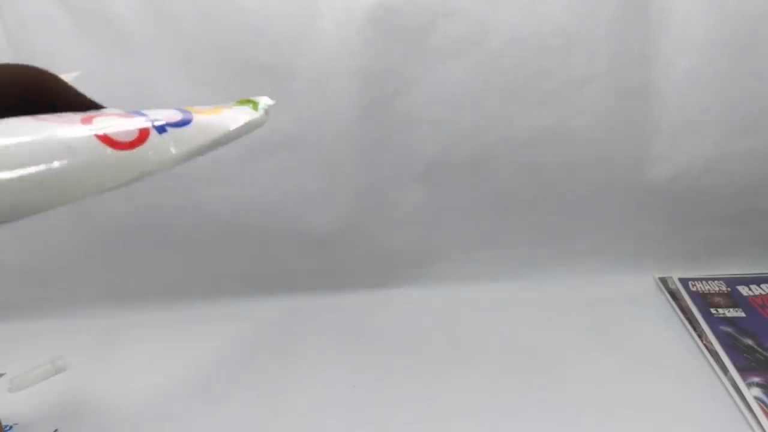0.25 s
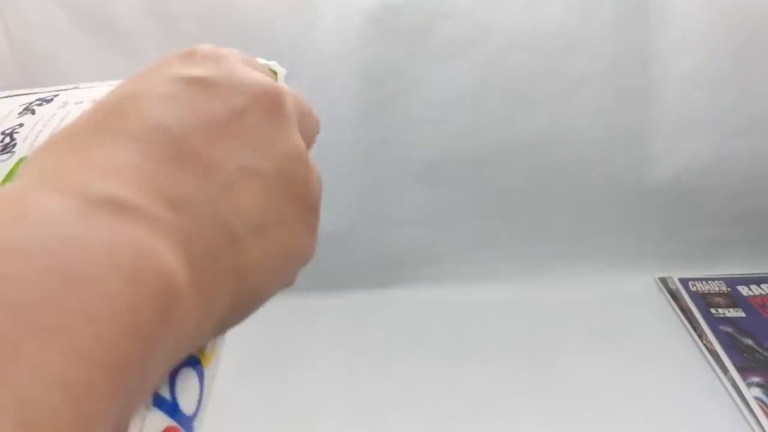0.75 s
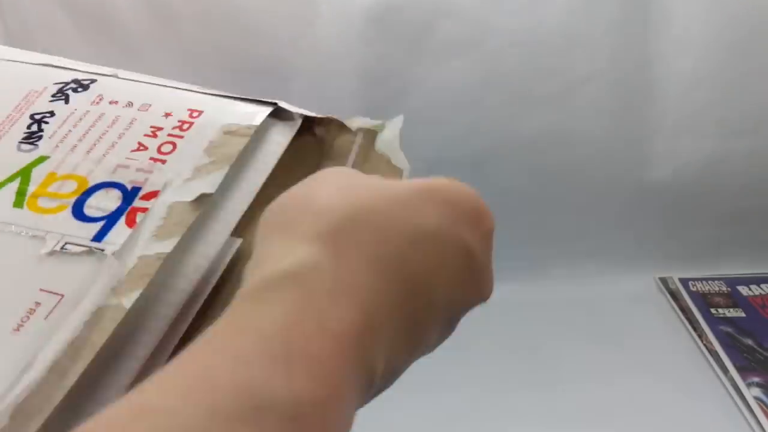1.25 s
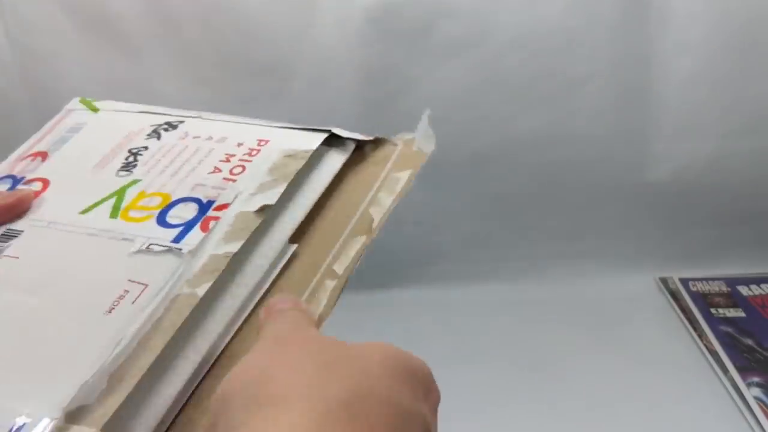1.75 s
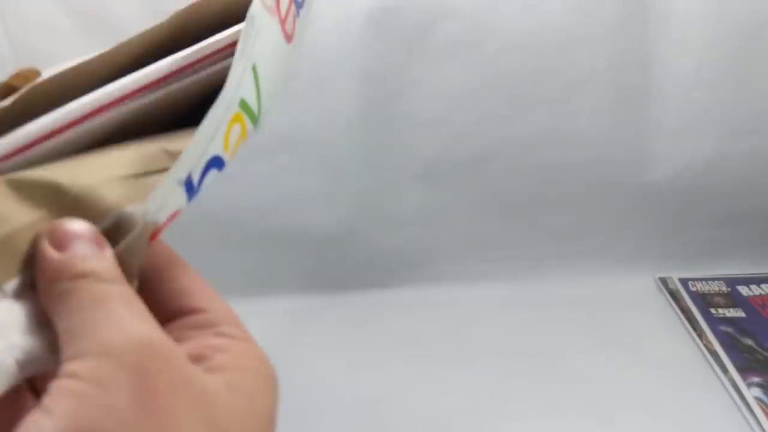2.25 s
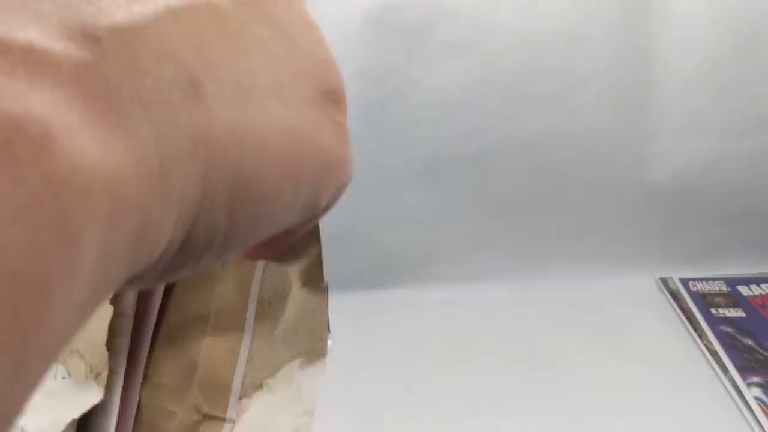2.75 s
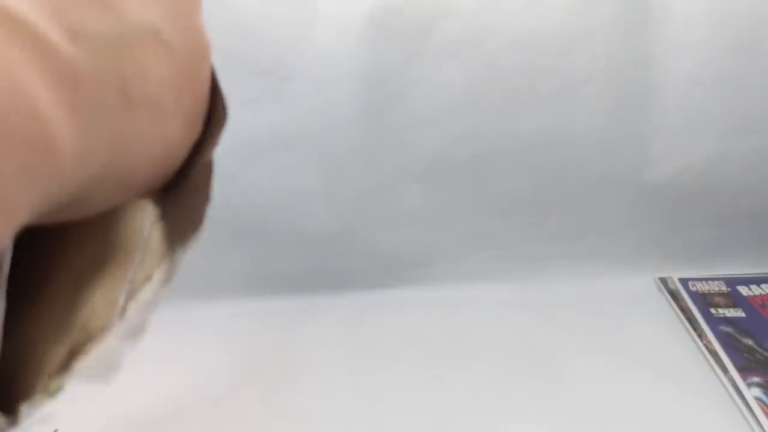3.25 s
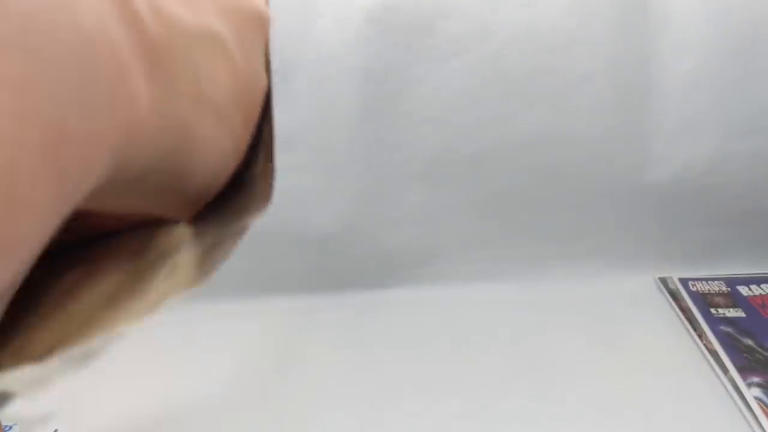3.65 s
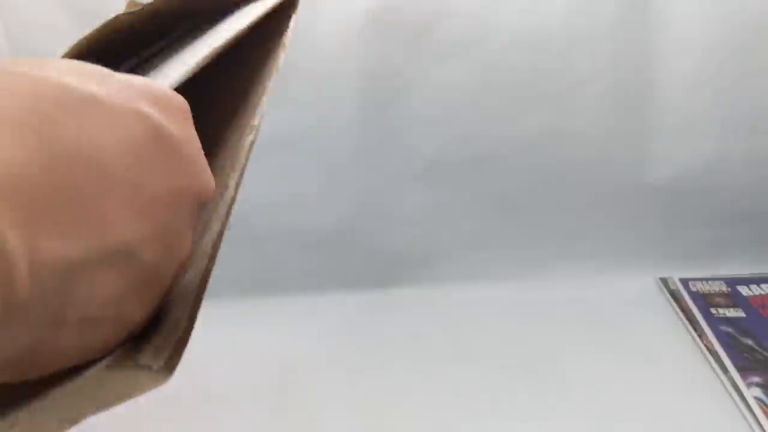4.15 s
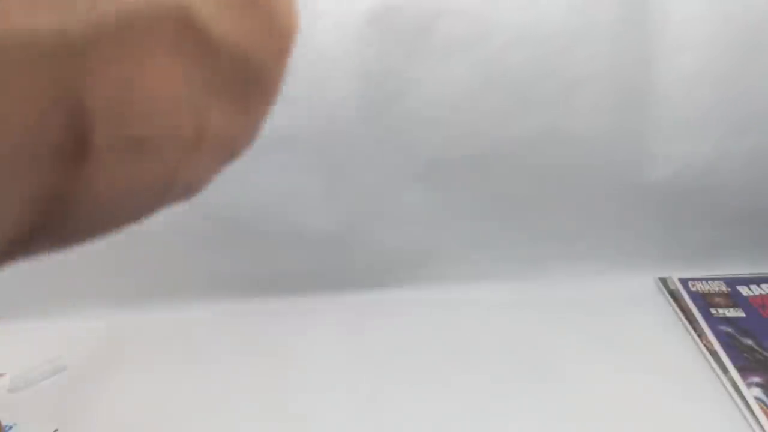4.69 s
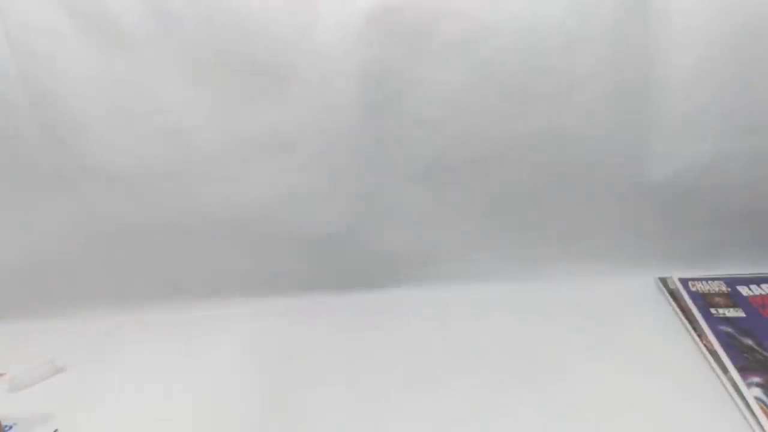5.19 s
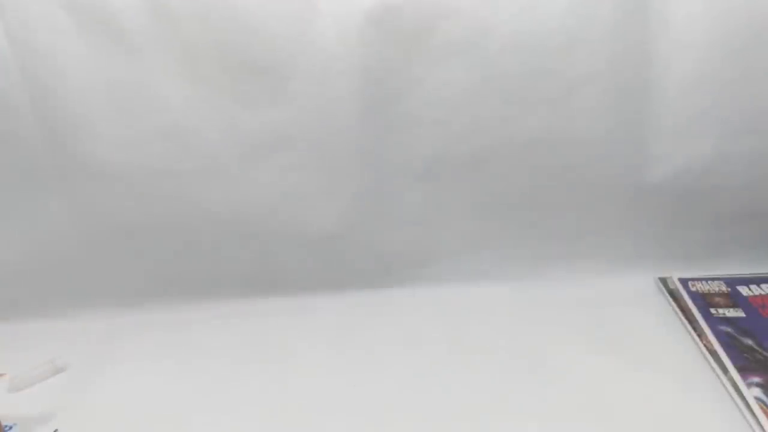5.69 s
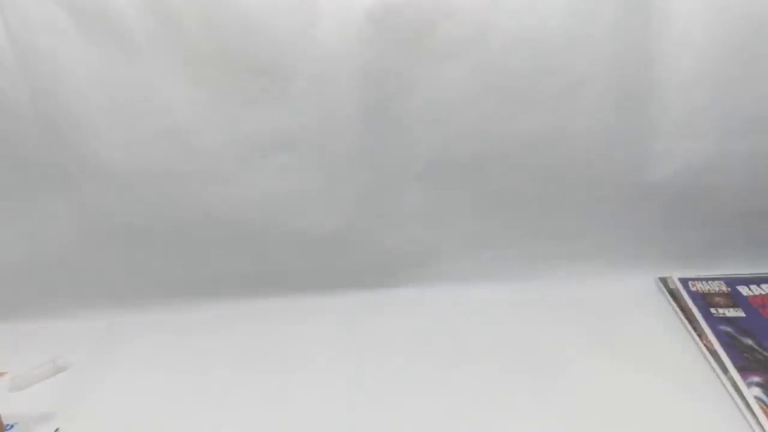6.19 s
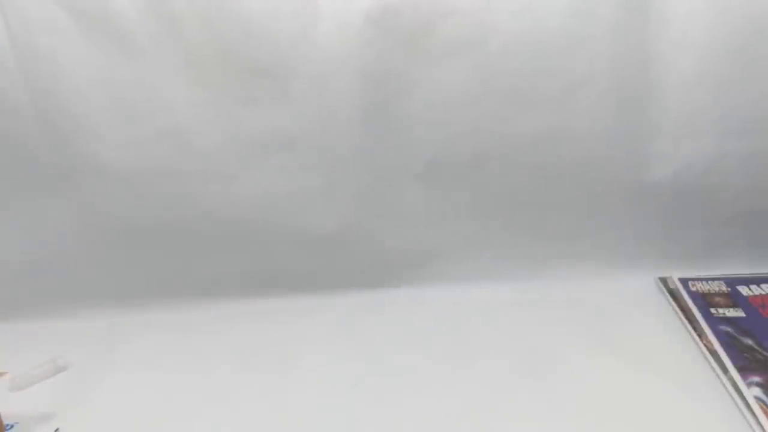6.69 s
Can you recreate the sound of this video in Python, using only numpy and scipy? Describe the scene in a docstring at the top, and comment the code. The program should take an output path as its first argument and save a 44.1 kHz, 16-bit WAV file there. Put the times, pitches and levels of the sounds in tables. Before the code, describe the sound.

Close, crisp cardboard cracking and papery scraping burst out at first, then thin to faint rustles, small pops and low thuds before fading.

```python
"""Hands turn, bend and pull open a cardboard mailer over a table, close to a phone in a small room.
The first two seconds are the busiest: board knocks, creases and glue snap, and the table booms under bumps.
After that come lighter strokes, pops and bumps; the last stroke fades after 6 s. Throughout, a faint hum
runs and the walls answer. Uneven clicks through resonances make paper and board; a sine makes the table."""
import sys
import numpy as np
from scipy import signal
from scipy.fft import rfft, irfft
from scipy.io import wavfile
from scipy.ndimage import uniform_filter1d

SR = 44100
rng = np.random.default_rng(int(sys.argv[2]) if len(sys.argv) > 2 else 0)


def transcribe(signal):
    """Save signal, clipped to [-1, 1], as a 16-bit WAV file at the path in sys.argv[1]."""
    frames = np.atleast_2d(signal).T
    limited = np.clip(frames, -1, 1)
    pcm = np.round(limited * 32767).astype(np.int16)
    wavfile.write(sys.argv[1], SR, pcm)


N = 305680  # length in samples, about 6.9 s

# The tones that thin paper, the board and the whole panel favour.
# Each row: centre in Hz, nominal width in Hz, strength in dB.
PAPER = [(3015, 3860, 2.5), (5390, 3930, 3.5), (7920, 1990, 4)]
BOARD = [(663, 1080, -2.5), (1180, 710, 2), (1860, 1030, -1)]
PANEL = [(127.6, 90, 8.5), (230, 44, 5.5), (350, 209, 1)]


def undb(db):
    """Turns decibels into a plain factor."""
    return 10 ** (np.asarray(db) / 20)


def level(x, db, size=None):
    """Scales by the rms of the first size samples, so they sit at db; db may also change over time."""
    return x * undb(db) / np.sqrt(np.mean(x[:size] ** 2))


def add(track, s, sound):
    """Mixes a sound into the track at s seconds."""
    i = max(int(s * SR), 0)
    track[i:i + len(sound)] += sound[:N - i]


def ring(x, hz, width_hz):
    """One resonance, gain 1 at its centre."""
    b, a = signal.iirpeak(hz, hz / width_hz, fs=SR)
    return signal.lfilter(b, a, x)


def steep(x, hz, width_hz):
    """Two resonances in a row at one pitch, the second twice as wide: weak on both sides."""
    return ring(ring(x, hz, width_hz), hz, 2 * width_hz)


def body(x, modes):
    """Several resonances of one object side by side, with alternating sign."""
    return sum((-1) ** k * undb(db) * steep(x, hz, width_hz) for k, (hz, width_hz, db) in enumerate(modes))


def slips(size, share, scatter_db):
    """Fibres that catch and let go: clicks of very uneven size on a share of the samples."""
    clicks = rng.standard_normal(size) * (rng.random(size) < share)
    return clicks * undb(scatter_db * rng.exponential(size=size))


def break_up(ms):
    """A first break and a run of smaller slips that come in bunches and die away over about ms."""
    t = np.arange(4096) / SR
    bunches = np.repeat(undb(4.0 * rng.standard_normal(64)), 64)
    fade = np.exp(-t * 1000 / np.clip(ms, .2, 40))
    run = slips(len(t), share=0.28, scatter_db=6.0) * bunches * fade
    run[0] = 0.91 * np.abs(run).max()  # the first break
    return run


def walk(rate):
    """Random wandering: rate new values per second, joined by straight slopes; spread a little under 1."""
    k = int(SR / rate)
    return uniform_filter1d(np.repeat(rng.standard_normal(N // k + 1), k), k)[:N]


def hum():
    """Steady noise of the house and the microphone, shaped from bass to treble."""
    # The colour of the noise. Each row: pitch in Hz, relative strength in dB per Hz.
    hum_curve = [(18, -37), (30, -11), (59, 0), (77, -7), (177, -14), (219, -23.5), (277, -18.5),
                 (299, -18.5), (15500, -42.5)]
    hz, db = np.transpose(hum_curve)
    f = np.fft.rfftfreq(N, 1 / SR) + 1  # 1 Hz up, to avoid log(0)
    shape = undb(np.interp(np.log(f), np.log(hz), db))
    return level(irfft(rfft(rng.standard_normal(N)) * shape, N), -65)


def room(x):
    """Wall echoes: noise bands that start after 3 ms and die away, each at its own speed."""
    # How the room echoes. Each row: pitch in Hz, time to fall 60 dB in seconds, strength in dB.
    echo_bands = [(125, 0.22, 3), (250, 0.47, -0.5), (700, 0.49, 5), (1200, 0.36, -0.5), (2120, 0.64, -1.5),
                  (5110, 0.35, -4), (12150, 0.18, -1.5)]
    echo_db = -12.5  # energy of the whole echo against the direct sound
    t = np.arange(int(.6 * SR)) / SR
    hz, t60, db = np.transpose(echo_bands)
    tail = 0
    for f in 60 * 2. ** np.arange(0, 8.5, .5):  # half-octave steps
        ring_s, band_db = (np.interp(np.log(f), np.log(hz), column) for column in (t60, db))
        band = undb(band_db) * steep(rng.standard_normal(len(t)), f, 0.67 * f)
        tail = tail + band * np.exp(-np.log(1000) * t / ring_s)
    tail = tail * np.clip((t - .003) / 0.0051, 0, 1)
    return signal.fftconvolve(x, undb(echo_db) * tail / np.sqrt(np.sum(tail ** 2)))[:N]


def bumps():
    """A soft push sets the table top swinging for a few cycles: a low sine that swells and dies."""
    # Bumps felt through the table top. Each row: start in seconds, level in dB before the swell and decay.
    pushes = [(0.127, -36), (0.53, -38.5), (0.861, -47), (1, -55), (1.2, -38.5), (1.278, -44), (1.741, -41),
              (2.047, -43), (3.076, -57), (3.761, -40.5), (3.963, -42), (4.121, -48), (4.453, -39.5),
              (4.603, -40), (4.97, -38.5), (5.527, -39.5), (5.585, -46), (5.646, -41.5), (5.878, -48.5),
              (6.27, -52)]
    table_hz, scatter = 62.3, 0.088  # the table's swing; how far the place of the push bends it (share)
    out, t = np.zeros(N), np.arange(SR // 2) / SR
    swell = 1 - np.exp(-t / 0.0035)
    swing = swell * np.exp(-np.log(1000) * t / 0.21)  # falls 60 dB in 0.21 s
    for (s, db), bend in zip(pushes, rng.standard_normal(len(pushes))):
        hz = table_hz * (1 + scatter * bend)
        add(out, s, undb(db) * swing * np.sin(2 * np.pi * hz * t))
    return out


def pressure():
    """Hiss and rustle levels in dB: a light grip, plus strokes that rise, hold and let go."""
    # Strokes of the hand over the paper. Each row: start of full pressure in seconds, rise in seconds,
    # hold in seconds, release in seconds, paper hiss in dB, board rustle in dB.
    strokes = [(0.0, .02, 0.036, 0.093, -51, -52), (0.07, 0.015, .003, .02, -48, -53),
               (0.106, 0.029, 0.047, 0.062, -41.5, -34.5), (0.198, .03, .003, 0.22, -53.5, -51.5),
               (0.342, 0.015, 0.0038, .025, -39, -33.5), (0.375, 0.021, 0.099, 0.09, -62.5, -62),
               (0.529, 0.028, 0.011, 0.18, -55.5, -49), (0.646, 0.28, .003, 0.45, -60, -61),
               (0.858, 0.21, 0.042, .05, -89, -64.5), (0.977, 0.054, .003, 0.17, -56.5, -52.5),
               (1.162, 0.022, .003, 0.096, -40, -31), (1.256, 0.16, .003, 0.33, -59.5, -52),
               (1.649, 0.049, 0.0025, 0.029, -42.5, -44.5), (1.742, 0.17, .003, 0.068, -52, -56.5),
               (1.8, .05, 0.022, 0.45, -59.5, -67.5), (2.034, 0.036, 0.0023, 0.012, -34.5, -45),
               (2.041, .02, .003, 0.1, -56, -44.5), (2.213, .2, .003, 0.055, -58, -64),
               (2.488, 0.36, .003, .04, -65, -68), (2.606, 0.16, 0.042, .15, -74.5, -66),
               (2.904, 0.6, .003, 0.11, -63, -65.5), (3.062, 0.086, 0.0026, 0.063, -61, -55.5),
               (3.103, 0.06, 0.015, 0.21, -57.5, -52), (3.197, 0.25, 0.044, 0.32, -57, -64),
               (3.633, 0.075, 0.037, 0.14, -60, -70), (3.724, 0.082, 0.075, 0.11, -56, -59.5),
               (3.975, 0.18, .003, 0.17, -62.5, -58), (4.092, 0.037, 0.019, 0.051, -46, -55.5),
               (4.253, 0.24, .003, .09, -58, -60), (4.401, 0.067, .003, .04, -56, -50),
               (4.45, 0.13, 0.05, .05, -62, -61.5), (4.561, 0.062, 0.08, 0.16, -44.5, -49),
               (4.91, .03, .04, .05, -61, -51.5), (4.983, 0.097, .003, 0.23, -46.5, -48),
               (5.336, 0.026, 0.057, 0.055, -71, -70.5), (5.53, .01, 0.016, 0.18, -83, -57.5),
               (5.647, 0.054, .003, .15, -56.5, -59.5), (5.72, 0.076, 0.16, 0.15, -62.5, -70),
               (5.913, 0.19, .003, 0.063, -54, -58), (5.966, .05, .03, .25, -67.5, -71),
               (6.117, 0.027, 0.28, 0.39, -57.5, -61)]
    swing_db = 24  # a stroke climbs this much in its rise time and drops it in its release time
    grip_hiss_db, grip_rustle_db, grip_ends_s = -72.5, -77, 5.4  # fingers that merely hold the mailer
    t = np.arange(0, N + 64, 64) / SR  # one value per 64 samples
    grip = undb(-swing_db * np.clip((t - grip_ends_s) / 0.26, 0, 1))
    power = np.outer(undb([grip_hiss_db, grip_rustle_db]), grip) ** 2
    for s, rise, hold, release, hiss_db, rustle_db in strokes:
        down = np.maximum(s - t, 0) / rise + np.maximum(t - s - hold, 0) / release
        power = power + np.outer(undb([hiss_db, rustle_db]), undb(-swing_db * down)) ** 2
    return [np.interp(np.arange(N) / SR, t, 10 * np.log10(p)) for p in power]


def slide():
    """Dense fibre slips, uneven in pressure, heard through paper, board and panel."""
    hiss_db, rustle_db = pressure()
    soft_db = -60  # the level from which the two slopes below are counted
    sheen_db = soft_db - 16 + 1.075 * (hiss_db - soft_db)  # the sheen grows faster than the hiss
    flex_db = soft_db - 2.5 + 0.77 * (rustle_db - soft_db)  # low flexing grows slower than the rustle
    fine = slips(N, share=.4, scatter_db=1.0) * undb(2.0 * walk(45))
    coarse = slips(N, share=.06, scatter_db=1.5) * undb(4.0 * walk(30))
    # each patch of the sheet catches on its own, so the colour keeps shifting
    hiss = 0
    for k, (hz, width_hz, db) in enumerate(PAPER):
        hiss = hiss + (-1) ** k * undb(db + 1.08 * walk(22)) * steep(fine, hz, width_hz)
    treble = signal.sosfilt(signal.butter(4, 9500, "high", fs=SR, output="sos"), fine)
    paper = level(hiss, hiss_db) + level(ring(treble, 9060, 2900), sheen_db)
    return paper + level(body(coarse, BOARD), rustle_db) + level(body(coarse, PANEL), flex_db)


def crackles():
    """Thin paper breaks, each coloured by the patch that lets go."""
    # Creases and glue let go. Each row: start in seconds, peak level in dB, colour in Hz,
    # fading time of the slips in ms.
    snaps = [(0.093, -31, 5220, 0.81), (0.104, -14.5, 8200, 1.15), (0.214, -39, 4640, 3.0),
             (0.334, -26, 4500, 4.1), (0.395, -36.5, 5030, 1.3), (0.41, -47, 6210, 3.0),
             (0.491, -39, 6440, 1.5), (0.768, -55, 3470, 2.1), (0.948, -45, 4000, 3.0),
             (1.345, -37.5, 3280, 4.1), (1.405, -43.5, 3880, 3.3), (1.572, -45, 5700, 1.5),
             (1.591, -34.5, 5330, 0.7), (1.645, -21, 5740, 0.23), (1.654, -40, 4780, 0.62),
             (1.66, -48, 3930, 2.3), (1.978, -42.5, 5170, 0.46), (2.016, -45, 5700, 5),
             (2.023, -23.5, 7100, 5.5), (2.028, -20.5, 6600, 1.9), (2.069, -28, 3900, 0.39),
             (2.256, -45, 5860, 2.0), (2.462, -48.5, 3600, 1.6), (2.481, -39.5, 5200, 1.3),
             (3.035, -44.5, 3370, 3.9), (3.462, -51, 4700, 3.4), (3.999, -38, 3230, 1.6),
             (4.082, -36, 6600, 3.4), (4.211, -43.5, 4840, 3.9), (4.33, -45, 6560, 1.5),
             (4.39, -45, 3510, 1.1), (4.397, -34, 5640, 1.6), (4.915, -38.5, 4100, 2.6),
             (5.331, -53, 5900, 2.5), (5.547, -52, 3070, 1.9), (5.589, -53, 4700, 2.5),
             (5.631, -44.5, 6140, 3.4)]
    out = np.zeros(N)
    for s, db, hz, ms in snaps:
        run = break_up(ms)
        crack = 0.37 * body(run, PAPER) + steep(run, hz, 0.35 * hz) + 0.043 * steep(run, 12000, 8000)
        add(out, s, undb(db) * crack / np.abs(crack).max())
    return out


def knocks():
    """One break excites the paper skin, the bent patch of board and the whole panel."""
    # The board pops or is knocked. Each row: start in seconds, crack peak in dB, board rms in dB,
    # board pitch in Hz, thud rms in dB, thud pitch in Hz, fading time of the slips in ms.
    pops = [(0.057, -26, -43, 1350, -47, 215, 3.9), (0.113, -18.5, -32.5, 1280, -37, 310, 1.4),
            (0.125, -33, -59, 1630, -35, 230, 5.9), (0.137, -41, -39, 900, -39.5, 282, 6.3),
            (0.155, -23, -34, 1750, -41.5, 335, 1.4), (0.17, -43, -44, 1160, -43, 312, 4.7),
            (0.344, -24.5, -48, 1400, -45, 332, 2.4), (0.45, -36.5, -51, 1200, -52, 170, 3.4),
            (0.521, -56, -56, 1400, -63, 350, 7.1), (0.538, -37, -42.5, 920, -62, 215, 2.4),
            (0.551, -53, -57, 1070, -47, 185, 3.3), (0.859, -67, -56, 700, -48.5, 250, 6.1),
            (0.885, -53, -57.5, 1630, -49.5, 139, 4.8), (0.985, -48, -55, 1000, -64, 414, 6.3),
            (1.103, -44, -40.5, 845, -47, 278, 1.7), (1.157, -15, -24, 1055, -51, 200, 1.2),
            (1.215, -37, -43, 990, -41.5, 335, 5.8), (1.31, -55, -62, 824, -46, 298, 5.9),
            (1.466, -49, -58, 670, -45.5, 382, 2.1), (1.578, -49, -38, 690, -40, 247, 1.6),
            (1.597, -51, -40, 880, -32, 300, 1.7), (1.738, -39, -52.5, 1740, -47, 308, 5.4),
            (1.755, -55, -56, 970, -49, 202, 3.9), (2.033, -21.5, -44.5, 1750, -46.5, 228, 2.2),
            (2.046, -46, -64, 1650, -44, 320, 2.6), (2.572, -51, -60.5, 1730, -60, 222, 7.3),
            (2.722, -46, -63, 1390, -59, 170, 5.2), (2.84, -65, -80, 1720, -59, 234, 4.4),
            (3.084, -50, -37, 1560, -41, 484, 3), (3.088, -57, -41, 1580, -34.5, 202.5, 4.4),
            (3.3, -30, -46, 2260, -50.5, 273, 1.1), (3.76, -59, -59, 1160, -49, 146, 7.3),
            (3.97, -47, -62, 990, -49, 212, 6.3), (4.365, -49, -60, 2050, -61, 181, 7),
            (4.535, -55, -48.5, 820, -44, 250, 7.3), (4.979, -35, -46.5, 1140, -49, 150, 5.6),
            (5.531, -58, -57.5, 1500, -51, 250, 1.5), (5.661, -54, -65, 850, -48, 150, 5),
            (5.883, -50, -54, 990, -50.5, 176, 0.98), (5.896, -56, -59.5, 830, -52, 350, 2.7),
            (6.115, -36, -51, 2040, -51.5, 209, 6.3)]
    heard = int(.016 * SR)  # board and thud levels hold for the first 16 ms
    out = np.zeros(N)
    for s, crack_db, board_db, board_hz, thud_db, thud_hz, ms in pops:
        run = break_up(ms)
        crack = body(run, PAPER)
        # the bent patch has a broad main tone and a weaker overtone
        patch = [(board_hz, 0.35 * board_hz, 0), (1.72 * board_hz, 0.17 * board_hz, -13.5)]
        board = body(run, patch) + 0.16 * body(run, BOARD)
        # the heavy panel feels mostly the first break, as one push
        push = run * np.where(np.arange(len(run)) == 0, 1, .12)
        thud = steep(push, thud_hz, 0.5 * thud_hz) + 0.28 * body(push, PANEL)
        add(out, s, undb(crack_db) * crack / np.abs(crack).max())
        add(out, s, level(board, board_db, heard) + level(thud, thud_db, heard))
    return out


def scene():
    """Everything near, its echo, and the hum."""
    near = knocks() + crackles() + bumps() + slide()
    return (near + room(near) + hum())[None]


def record(dry):
    """The phone drops the deepest bass (below 48 Hz) and cuts the top (above 15900 Hz)."""
    bass_cut = signal.sosfilt(signal.butter(3, 48, "high", fs=SR, output="sos"), dry)
    return signal.sosfilt(signal.ellip(10, .2, 70, 15900, fs=SR, output="sos"), bass_cut)


dry = scene()
out = record(dry)
transcribe(out)
```